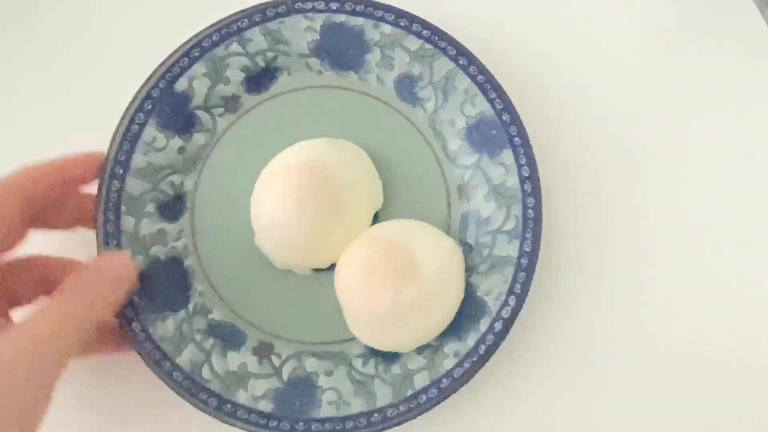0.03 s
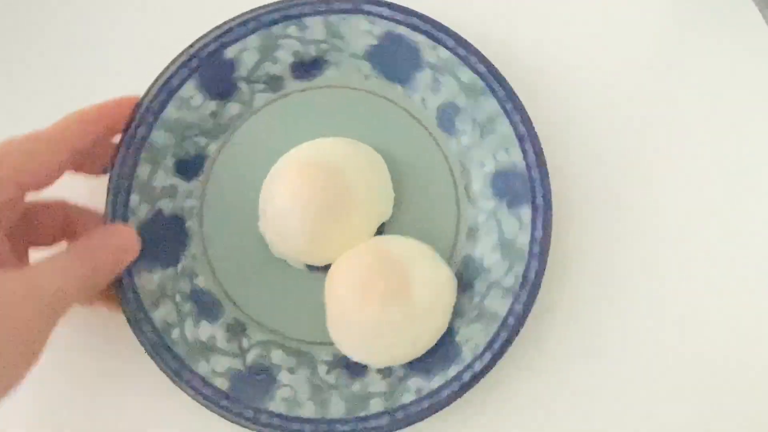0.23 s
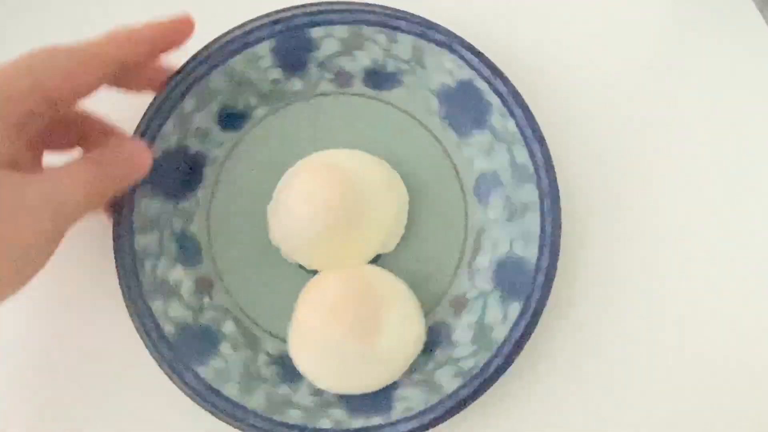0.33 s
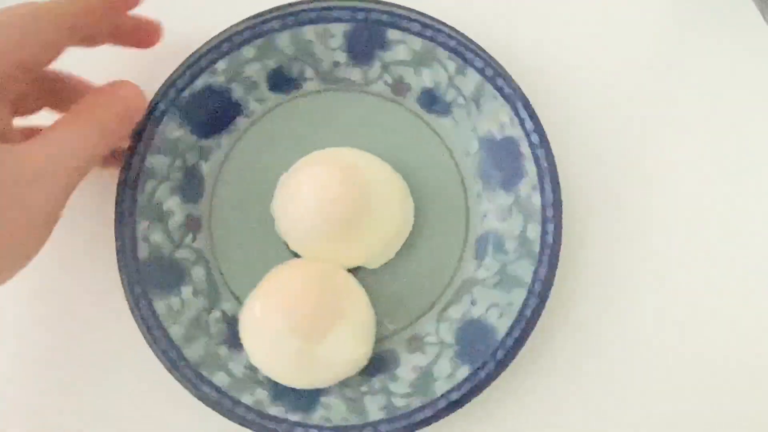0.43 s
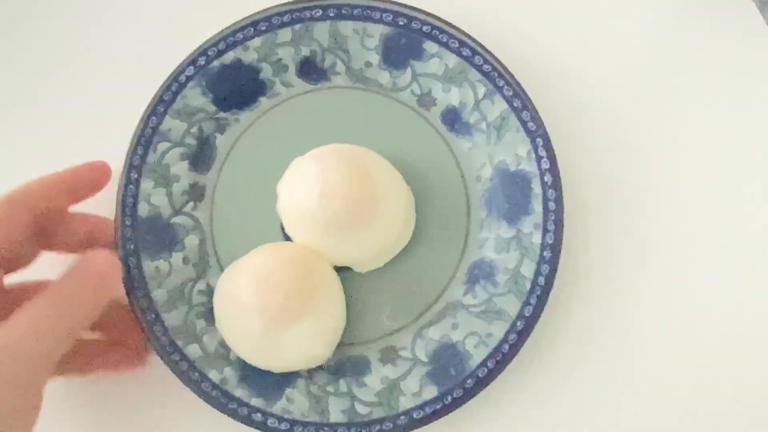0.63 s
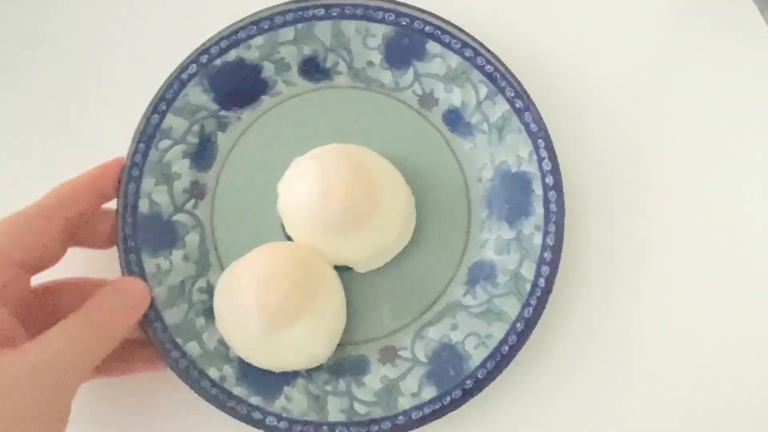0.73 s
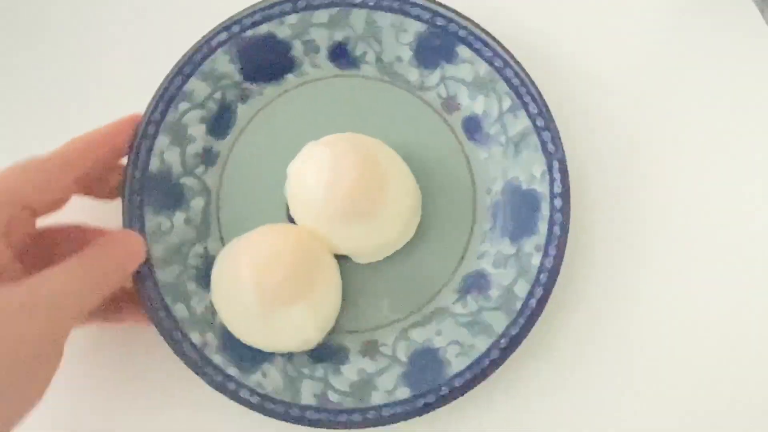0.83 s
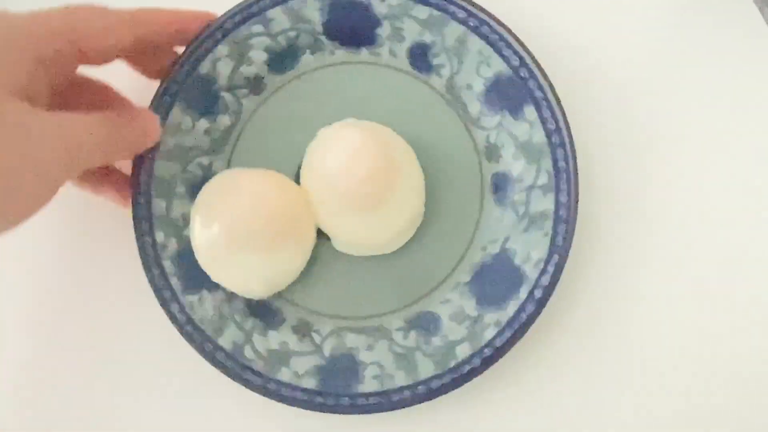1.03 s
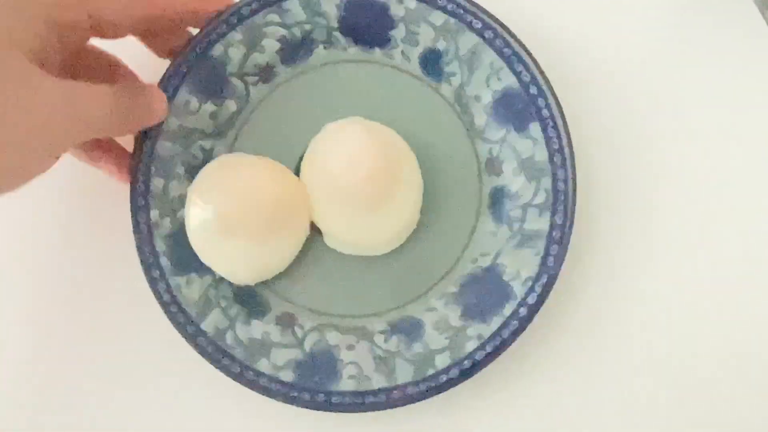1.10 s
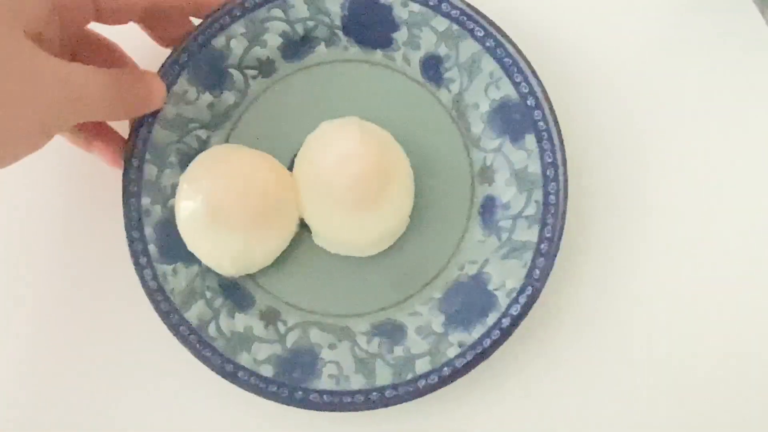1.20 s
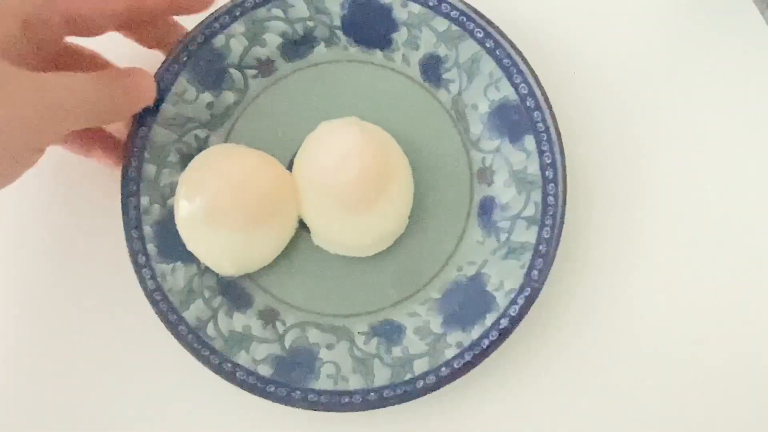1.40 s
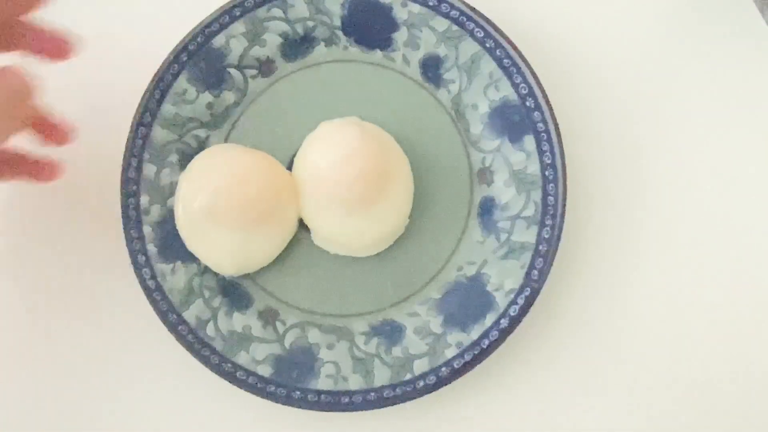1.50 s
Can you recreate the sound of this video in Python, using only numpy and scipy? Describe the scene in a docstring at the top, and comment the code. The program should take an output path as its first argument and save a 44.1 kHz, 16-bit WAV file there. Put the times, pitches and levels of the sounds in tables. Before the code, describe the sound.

A ceramic plate scrapes on a tabletop as it is turned, close by in a small, quiet room. The first gritty, ringing stroke swells from about 0.1 seconds, peaks with low shudders around 0.4 and dies away by 0.7. A second, slightly softer stroke starts at 0.75 seconds, judders along until about 1.1, then fades to near silence by 1.4.

```python
"""A gritty, ringing scrape in two slow strokes: a hand turns a ceramic plate on a tabletop.
The plate's foot ring catches and slips thousands of times a second. These tiny slips make the
table's board hum broadly, ring narrow notes in table and plate, and add a hiss on top.
Bigger catches give low shudders. The table thrums faintly under the hand, in a small, quiet room."""
import sys
import numpy as np
from scipy import signal
from scipy.io import wavfile
from scipy.ndimage import uniform_filter1d

SR = 44100
rng = np.random.default_rng(int(sys.argv[2]) if len(sys.argv) > 2 else 0)


def dump(signal):
    """Clip the signal to [-1, 1] and save it as 16-bit WAV at the path in sys.argv[1]."""
    limited = np.clip(np.atleast_2d(signal).T, -1, 1)
    pcm = np.round(limited * 32767).astype(np.int16)
    wavfile.write(sys.argv[1], SR, pcm)


N = 68355
TIME = np.arange(N) / SR

# The rubbing rises and falls with the turning speed.
# Each row: time in seconds, level of the body in dB, level of the treble in dB.
RUBBING = [(0, -54, -53), (.035, -64, -60), (.07, -74, -78.5), (.1, -80, -75), (.122, -58, -71),
           (.145, -47, -55.5), (.19, -37.5, -46), (.255, -33.5, -42), (.345, -27, -37), (.43, -26, -40.5),
           (.495, -32, -49), (.6, -46.5, -61), (.68, -61, -79.5), (.728, -61.5, -82), (.752, -44, -55.5),
           (.785, -34.5, -50), (.85, -29.5, -45.5), (.893, -35, -46), (.925, -31, -46.5), (1.02, -30, -46),
           (1.09, -35, -51.5), (1.2, -46, -60), (1.25, -54, -93), (1.37, -76.5, -97), (1.55, -84.5, -84)]
def scrape():
    """The foot ring judders along and drives board, hiss and ringing notes; board and hiss echo."""
    body_db, treble_db = in_time(RUBBING)
    force, judder = slips(), drift(per_second=49)
    body = from_db(body_db + 2.24 * judder)
    treble = from_db(treble_db + .35 * judder) + finger_ticks()
    broad = body * board_hum(force) + treble * foot_hiss(force)
    ringing = body * plate_and_table_ring(force) + treble * plate_ring(force)
    return broad + from_db(1) * room_echoes(broad) + ringing


def slips(per_second=4500, spread_db=.5, smooth_db=-4):
    """Tiny uneven slips over smooth friction, as two pairs of forces that share the same slip times."""
    slipping = rng.random(N) < per_second / SR
    sizes = from_db(spread_db * np.minimum(rng.exponential(1, N), 4))
    pushes, smooth = rng.standard_normal((2, 2, 2, N))
    return rms_one(slipping * sizes * pushes) + from_db(smooth_db) * smooth


# The low ringing notes of plate and tabletop together.
# Each row: pitch in Hz, width in Hz (narrow rings longer), relative level in dB in the first stroke,
# the same in the second stroke, dB louder on the left than on the right.
PLATE_AND_TABLE_NOTES = [(200.4, 15, -22.5, -14, -3), (241, 16, -15.5, -27.5, -1.5),
                         (296.7, 11, -11.5, -5.5, -2.5), (335.2, 20, -11.5, -10.5, 1.5),
                         (389.7, 12, -3.5, -11, 6), (401.9, 29, -5, -9, -16.5),
                         (487, 5.3, -13.5, -13.5, 1.5), (612.3, 16, -8.5, -9, 8),
                         (659.8, 5.6, -8.5, -10, -4), (758, 5.3, -13, -34, -8), (837.6, 11, -14, -22.5, 5),
                         (1003, 9, -18.5, -22, 16.5), (1047, 3.8, -16.5, -33, 5.5),
                         (1186, 13, -13, -20.5, 7), (1231, 12, -20, -31.5, -9),
                         (1331.6, 7.8, -18.5, -23.5, -4.5), (1466, 5.6, -19.5, -36.5, -5)]
def plate_and_table_ring(force):
    """The slips ring low notes in plate and tabletop together."""
    return from_db(-.9) * ring_notes(force, PLATE_AND_TABLE_NOTES)


# The plate's own notes. Each row: pitch in Hz, width in Hz, relative level in dB in the first
# stroke, the same in the second stroke, dB louder on the left than on the right.
PLATE_NOTES = [(1870, 25, -14, -10.5, -12.5), (2474, 8.8, -10.5, -12, 1.5), (2988, 22, -14, -17, 4.5),
               (3123, 12, -14, -19, 1.5), (3460, 94, -22.5, -23, -5.5), (3805, 24, -19.5, -19, 7),
               (4510, 470, -23, -30, -2), (5144, 90, -23, -24, 2), (6780, 76, -23.5, -22.5, 0.5),
               (7270, 370, -14.5, -14, 3.5), (10290, 310, -18, -21, 0.5)]
def plate_ring(force):
    """The slips ring thin, high notes in the ceramic."""
    return ring_notes(force, PLATE_NOTES)


def ring_notes(force, notes, regrip_s=.7):
    """Friction keeps each note ringing; a new grip loads another part of the foot and shifts the mix."""
    out = 0
    for k, (hz, width, first_db, second_db, pan_db) in enumerate(notes):
        ringing = resonate(resonate(force[k % 2], hz, width), hz, 6 * width)
        ringing /= np.sqrt(uniform_filter1d(ringing ** 2, size=2400) + .02)  # even out its strength
        share = uniform_filter1d(from_db(np.where(TIME < regrip_s, first_db, second_db)), size=2000)
        out = out + pan(pan_db) * share * widen(*ringing, hz) / np.sqrt(2)
    return out


# The tone of the table's board. Each row: frequency in Hz, relative level in dB.
BOARD_TONE = [(80, -35), (125, -10.5), (170, -23), (250, -6), (370, 3), (470, -7.5), (640, -2.5),
              (900, -9.5), (1250, -23), (1600, -23.5), (2100, -20), (3000, -46)]
def board_hum(force):
    """The slips shake the board over a broad range of pitches."""
    return from_db(-8.5) * shaped_noise(force, BOARD_TONE)


# The tone of the hiss. Each row: frequency in Hz, relative level in dB.
HISS_TONE = [(400, -9), (700, 5.5), (1300, 7), (2000, -3.5), (2600, 4.5), (3500, -1.5), (4300, -4.5),
             (4800, -10), (6000, -15.5), (7200, -7.5), (8900, -30), (10500, -10.5), (12800, -28),
             (15200, -14.5)]
def foot_hiss(force):
    """The unglazed foot ring makes a gritty hiss as it slides."""
    return from_db(-1) * shaped_noise(force, HISS_TONE)


# The bigger catches of the foot. Each row: start in seconds, peak level in dB, pitch in Hz.
SHUDDERS = [(0.247, -39, 367), (0.327, -23, 268), (0.362, -21, 381), (0.822, -27, 308), (0.956, -31.5, 315),
            (0.995, -27, 385)]
def shudders(rise_s=.0086):
    """The foot catches and lets go: a low tone swells and quickly dies."""
    out = np.zeros(N)
    for start, db, hz in SHUDDERS:
        age = np.maximum(TIME - start, 0)
        swell = age / rise_s * np.exp(1 - age / rise_s)
        out += from_db(db) * swell * np.sin(2 * np.pi * hz * age)
    return out


# How strong the thrum is. Each row: time in seconds, relative level in dB.
THRUM_LEVELS = [(0, -57), (.28, -55.5), (.35, -55.5), (.42, -54), (.6, -54), (.71, -69), (.78, -54),
                (1.0, -53.5), (1.12, -46), (1.2, -69.5), (1.3, -59), (1.55, -94)]
# The table's lowest notes. Each row: pitch in Hz, width in Hz, relative level in dB.
THRUM_NOTES = [(67.4, 17, -9.5), (113.2, 29, -6)]
def table_thrum():
    """The hand's uneven push stirs the lowest notes of the table."""
    level_db, = in_time(THRUM_LEVELS)
    low = 0
    for hz, width, db in THRUM_NOTES:
        push = rng.standard_normal(N)
        low = low + from_db(db) * resonate(resonate(push, hz, width), hz, 2 * width)
    return from_db(level_db - 2.5) * rms_one(low)


# Faint ticks at the end. Each row: start in seconds, level in dB.
FINGER_TICKS = [(1.328, -74.5), (1.402, -78)]
def finger_ticks(decay_s=.0048):
    """Fingers leave the rim with flicks of friction: brief jumps in the scrape's treble level."""
    return sum(from_db(db) * (TIME > start) * np.exp(-np.abs(TIME - start) / decay_s)
               for start, db in FINGER_TICKS)


def room_echoes(sound, fade_s=.22, dull_hz=3540):
    """Dull repeating echoes, different on each side, that fall by 60 dB in fade_s."""
    out = np.zeros((2, N))
    dull = signal.sosfilt(signal.butter(1, dull_hz, fs=SR, output="sos"), sound)
    lags = (rng.uniform(.007, .035, size=20) * SR).astype(int)
    for k, lag in enumerate(lags):
        side = k % 2
        loop, gain = dull[side].copy(), from_db(-60 * lag / SR / fade_s)
        for i in range(lag, N, lag):
            loop[i:i + lag] += gain * loop[i - lag:i][:N - i]
        out[side] += (loop - dull[side]) * (-1) ** (k // 2)
    return out / np.sqrt(10)


# The tone of the quiet room. Each row: frequency in Hz, relative level in dB.
AIR_TONE = [(25, -14), (60, 0), (140, 1.5), (250, -3.5), (500, -20), (1000, -25), (3000, -27.5),
            (8000, -32), (15000, -33.5)]
def still_air():
    """The room's air is a very faint, steady, low noise."""
    return from_db(-71) * shaped_noise(rng.standard_normal((2, 2, N)), AIR_TONE)


# Which way the noise leans. Each row: frequency in Hz, dB louder on the left than on the right.
LEFT_LEAN = [(60, 7.5), (200, -5), (380, 1), (700, -1.5), (1300, 2), (4400, 2.5), (8000, -1), (15000, 0)]
def shaped_noise(drives, tone):
    """Stereo noise of power 1, from quarter-octave bands that take turns between two drive pairs."""
    out, edges = 0, 24 * 2 ** np.arange(0, 9.6, .25)
    for k, (low, high) in enumerate(zip(edges, edges[1:])):
        hz = np.sqrt(low * high)
        if tone[0][0] / 2 < hz < tone[-1][0] * 2:
            band = signal.butter(2, [low, high], "band", fs=SR, output="sos")
            mid, side = signal.sosfilt(band, drives[k % 2])
            out = out + from_db(at_hz(tone, hz)) * pan(at_hz(LEFT_LEAN, hz)) * widen(mid, side, hz)
    return rms_one(out)


# How alike the two sides are. Each row: frequency in Hz, likeness (1 is alike, -1 or less is opposite).
SIDE_LIKENESS = [(60, 1), (200, 0.56), (380, 0.81), (700, -0.029), (1300, 0.4), (2400, -0.044),
                 (5200, 0.019), (7000, .6), (9000, -2.2), (10500, 0.57), (13000, 1), (15000, -0.62)]
def widen(mid, side, hz):
    """Left and right from two unrelated signals, with a stereo width that varies by pitch."""
    alike = np.clip(at_hz(SIDE_LIKENESS, hz), -.99, .99)
    return np.sqrt(1 + alike) * mid + np.sqrt(1 - alike) * side * [[1], [-1]]


def resonate(x, hz, width):
    """Let a signal ring at one pitch, at power 1."""
    r = np.exp(-np.pi * width / SR)
    return rms_one(signal.lfilter([1, 0, -1], [1, -2 * r * np.cos(2 * np.pi * hz / SR), r * r], x))


def drift(per_second):
    """A smooth random wobble of typical size 1, worked out every 40 samples."""
    r = np.exp(-80 * np.pi * per_second / SR)
    slow = signal.lfilter([1], [1, -2 * r, r * r], rng.standard_normal(N // 40 + 2002))[2000:]
    return np.interp(np.arange(N) / 40, np.arange(len(slow)), rms_one(slow))


def pan(db):
    """Left and right gains for a level difference."""
    return rms_one(from_db(np.array([[db], [-db]]) / 2))


def in_time(rows):
    """Read a table's columns at every sample."""
    seconds, *columns = np.transpose(rows)
    return [np.interp(TIME, seconds, column) for column in columns]


def at_hz(rows, hz):
    """Read a table between its rows, with octaves evenly spaced."""
    frequencies, values = np.transpose(rows)
    return np.interp(np.log(hz), np.log(frequencies), values)


def from_db(db):
    """Turn decibels into a gain."""
    return 10 ** (np.asarray(db) / 20)


def rms_one(x):
    """Scale to an average power of 1."""
    return x / np.sqrt(np.mean(x ** 2) + 1e-20)


def scene():
    """The scrape and its shudders, over the table's thrum and still air."""
    air = still_air()
    return scrape() + shudders() + table_thrum() + air


def record(dry):
    """Cut the treble steeply above 15800 Hz."""
    return signal.sosfilt(signal.ellip(10, .2, 80, 15800, fs=SR, output="sos"), dry)


dry = scene()
out = record(dry)
dump(out)
```